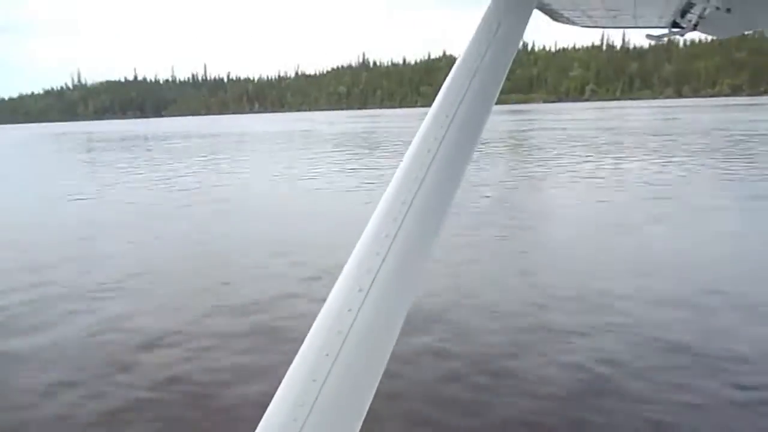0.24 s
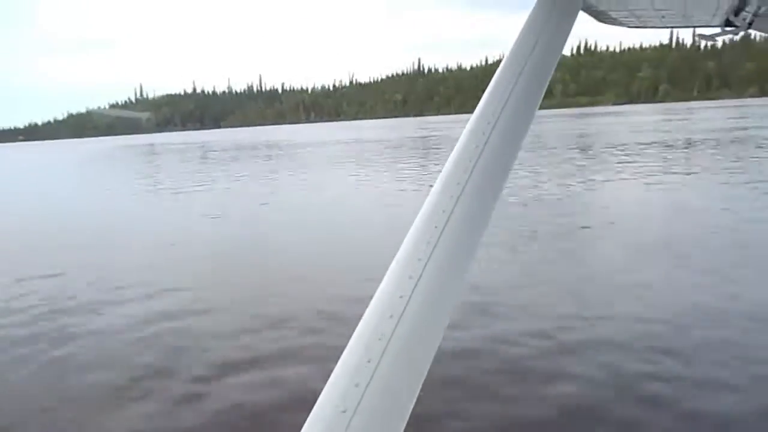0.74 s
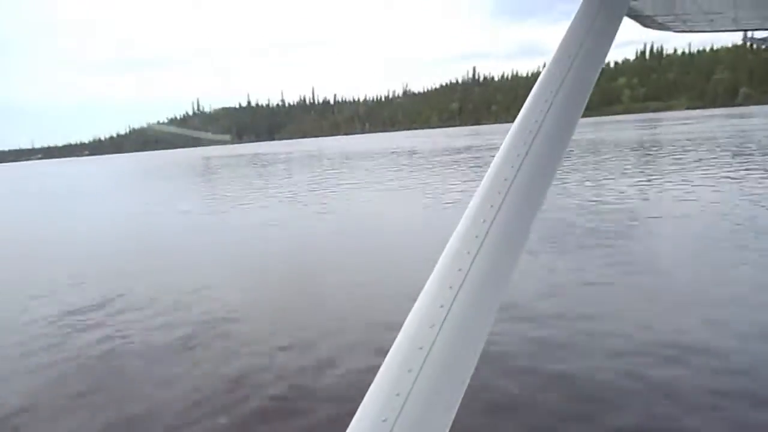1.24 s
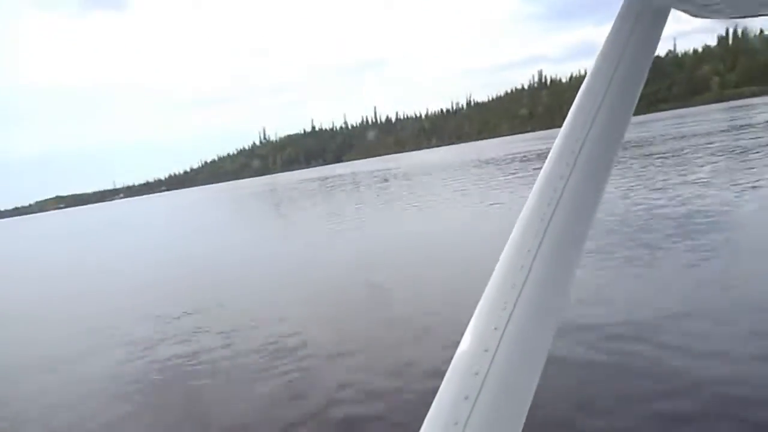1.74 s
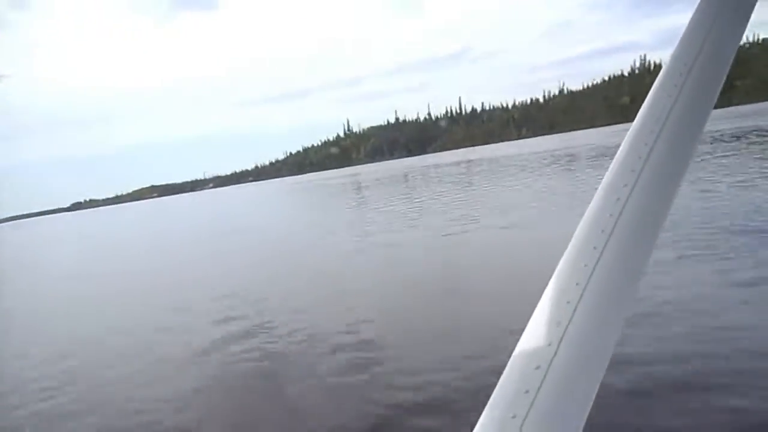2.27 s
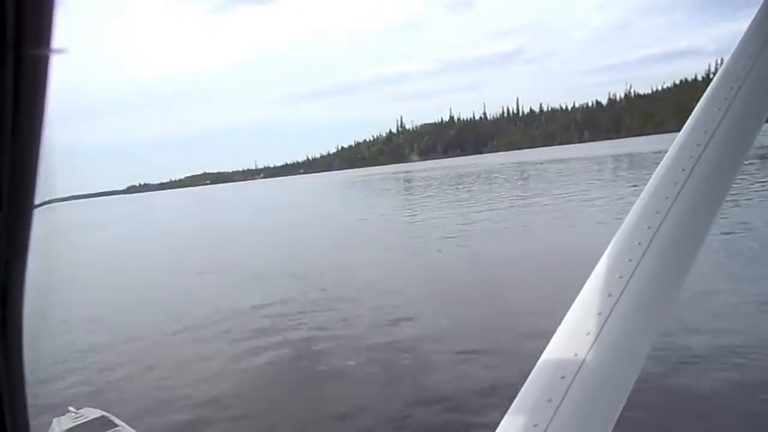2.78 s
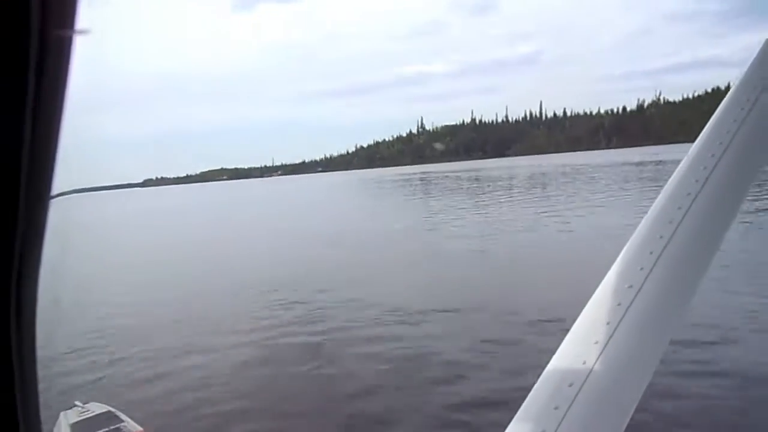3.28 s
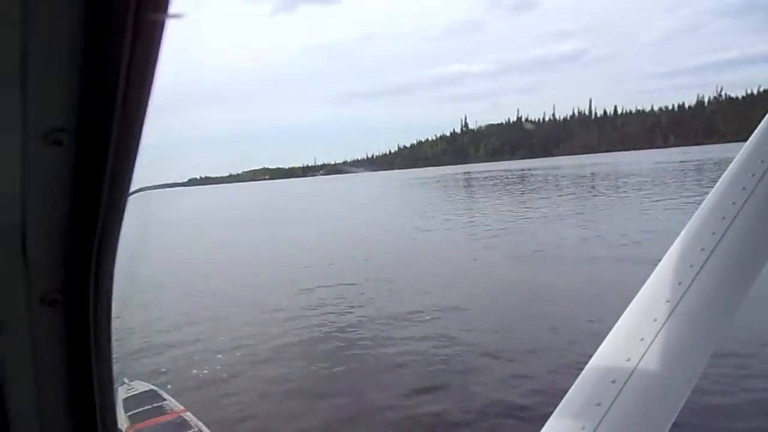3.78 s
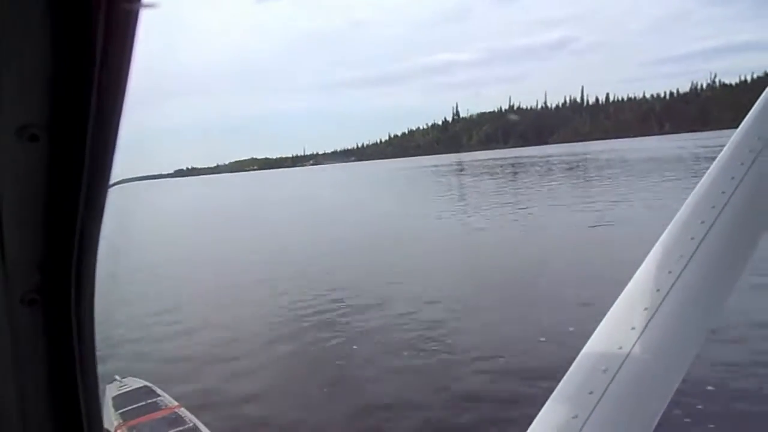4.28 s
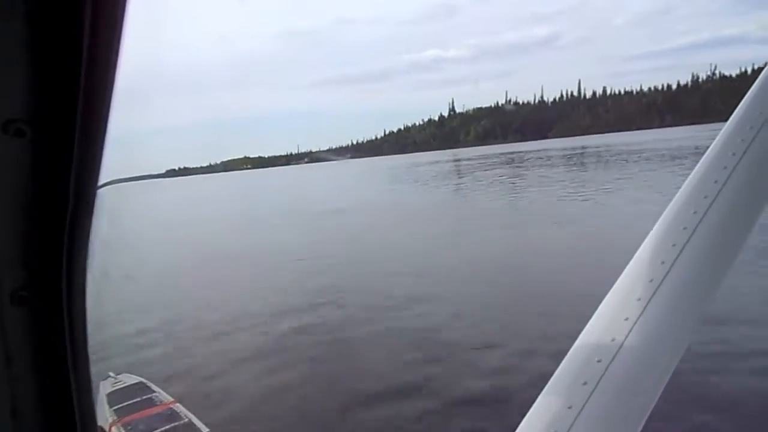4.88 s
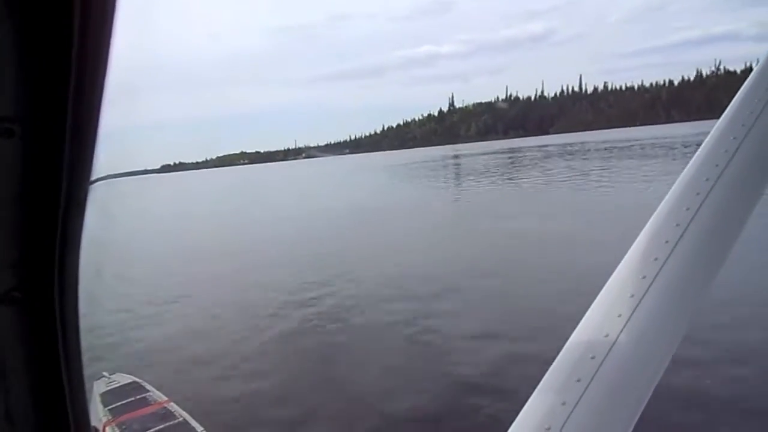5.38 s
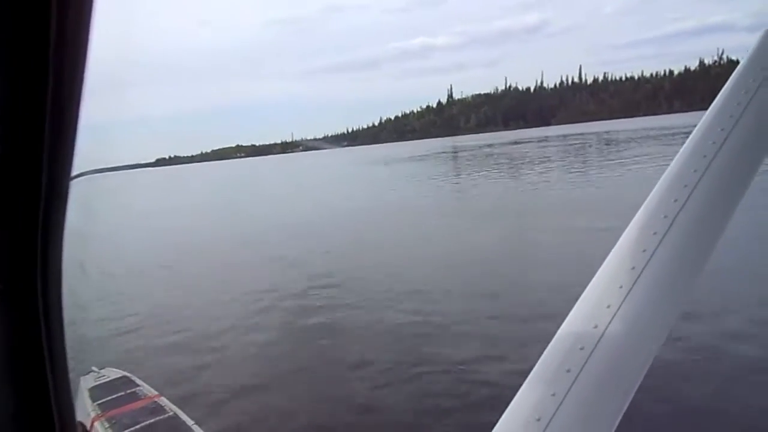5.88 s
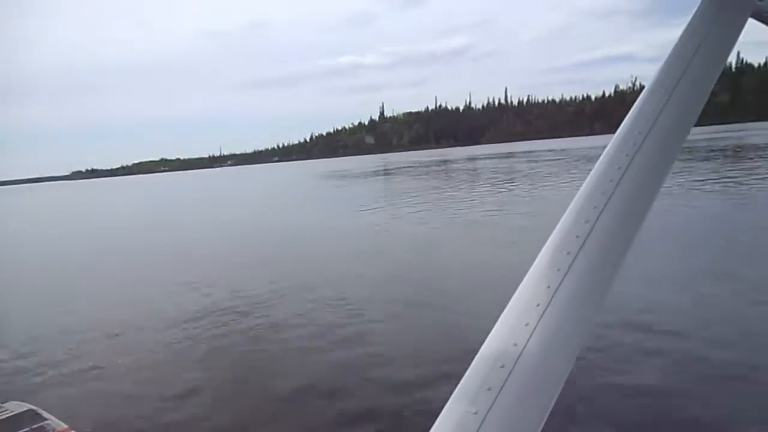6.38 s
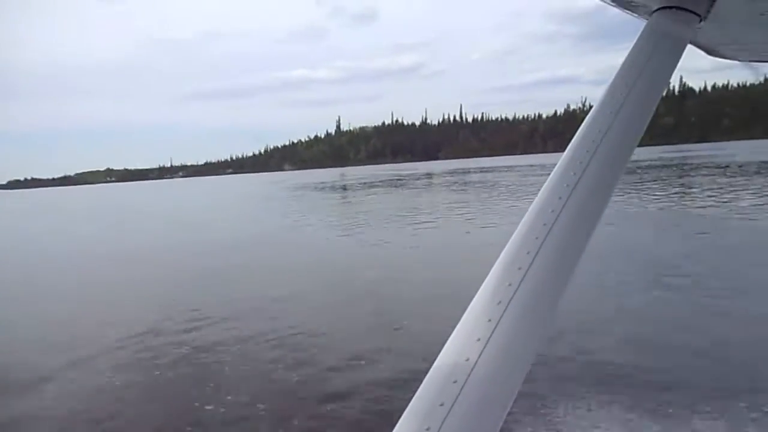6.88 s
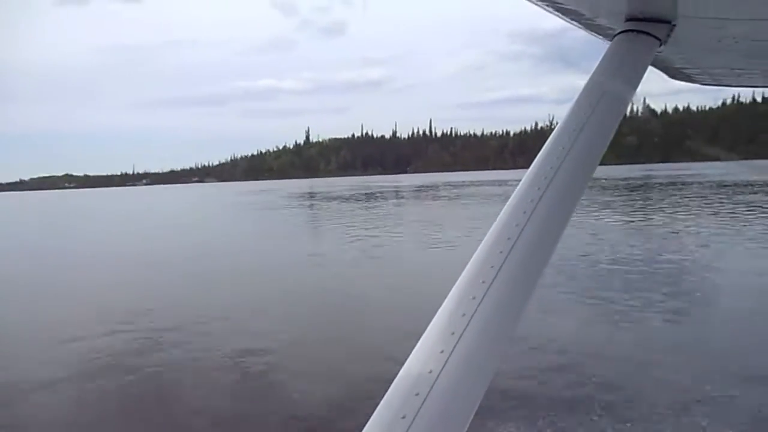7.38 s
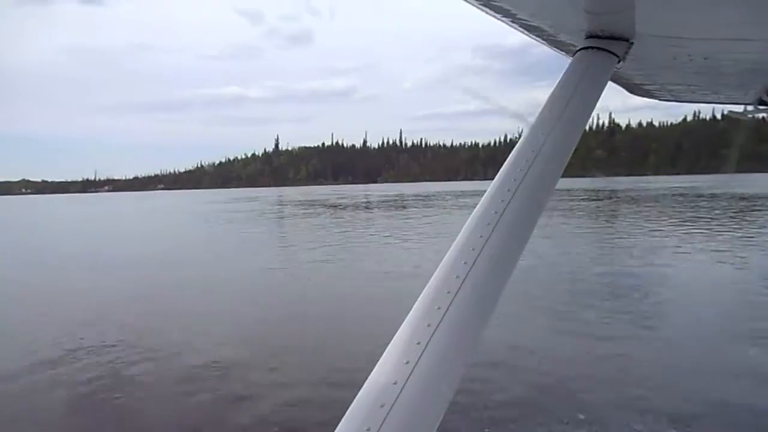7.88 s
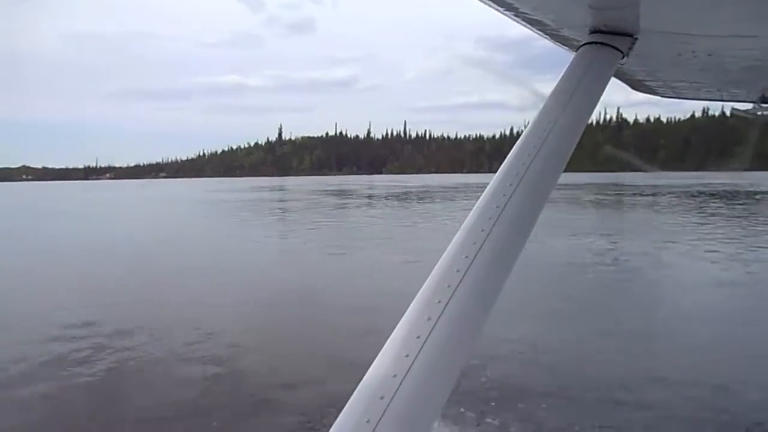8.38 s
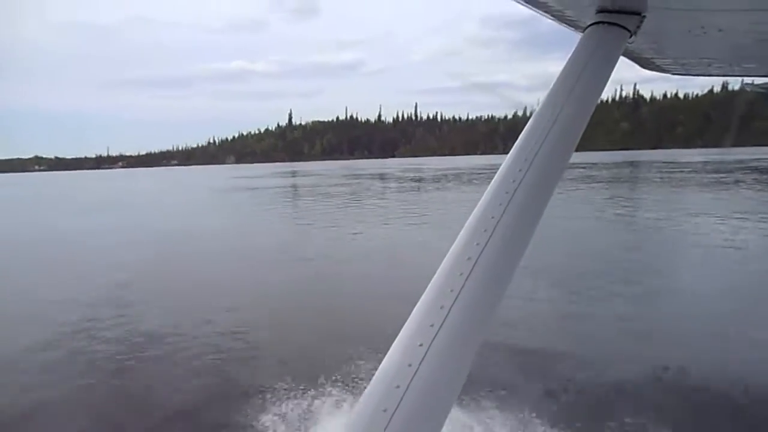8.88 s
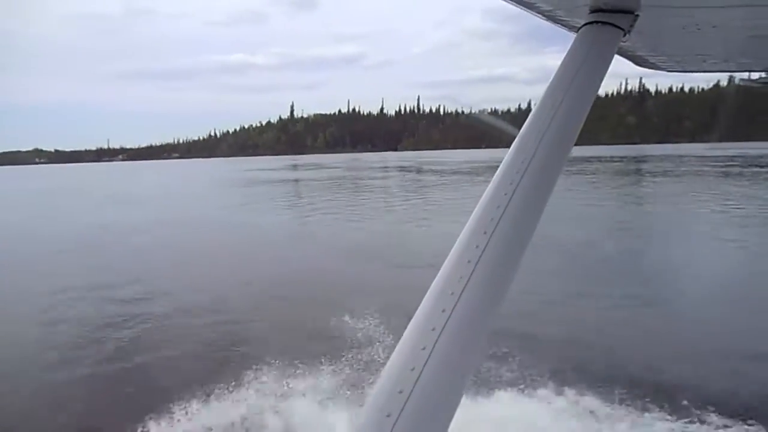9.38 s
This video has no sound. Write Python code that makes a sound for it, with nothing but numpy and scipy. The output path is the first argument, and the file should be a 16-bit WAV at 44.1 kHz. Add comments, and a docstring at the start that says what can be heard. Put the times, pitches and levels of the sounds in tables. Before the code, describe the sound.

From the start, a deep, uneven piston engine and propeller boom inside a small floatplane's cabin, with a low rumble and air rushing and hissing past the window. At about 0.8 seconds the throttle closes and the engine falls in pitch over the next few seconds, settling into a loping idle. A faint gear whine sinks with it, and a thin, wavering whistle sounds from about 1.4 to 3 seconds, along with a few tiny ticks. Loose trim clacks dully at 4 seconds and again at 6, the second leaving a faint metallic ring. The whistle returns near 7.7 seconds. At about 8.2 seconds the float touches the lake: water drums low on it, spray patters and hisses softly, and the engine beats a little harder until the end, around 9.6 seconds. The engine stays close and dominant throughout.

```python
"""Inside a floatplane settling onto a lake. From the start the nine-cylinder radial's uneven exhaust and
the two-blade propeller boom in the cabin, a gear whines faintly and air rushes past the window.
At 0.84 s the throttle closes and the engine runs down to a loping idle. A window gap whistles, small
fittings tick, loose trim knocks at 4 and 6 s, and the whistle returns. At 8.15 s the float touches:
water drums on it, spray patters and hisses, and the engine beats harder against the drag."""
import sys
import numpy as np
from scipy import signal
from scipy.fft import rfft, irfft, next_fast_len
from scipy.io import wavfile
from scipy.ndimage import uniform_filter1d, map_coordinates

SR = 44100
rng = np.random.default_rng(int(sys.argv[2]) if len(sys.argv) > 2 else 0)


def bounce(signal):
    """Save signal as a 16-bit WAV file at the path given by the first command-line argument."""
    frames = np.transpose(np.atleast_2d(signal))
    limited = np.clip(frames, -1, 1)
    pcm = np.round(limited * 32767).astype(np.int16)
    wavfile.write(sys.argv[1], SR, pcm)


N = 425120
TIME_S = np.arange(N) / SR


def amp(db):
    """Decibels to gain."""
    return 10 ** (np.asarray(db) / 20)


def unit(x):
    """Scale to rms 1."""
    return x / np.sqrt(np.mean(x ** 2) + 1e-20)


def along(points, hz):
    """Interpolate (Hz, value) points on a log axis."""
    point_hz, values = np.transpose(points)
    return np.interp(np.log(hz + 1), np.log(point_hz + 1), values)


def curve(points):
    """Interpolate (seconds, value) points at every sample."""
    return np.interp(TIME_S, *np.transpose(points))


def swell(start_s, attack_s, end_s, release_s):
    """Rise from 0 to 1 after the start, hold, fall after the end."""
    return np.clip((TIME_S - start_s) / attack_s, 0, 1) * np.clip(1 - (TIME_S - end_s) / release_s, 0, 1)


def wobble(rate_hz):
    """Smooth random curve of rms near 1."""
    knots = rng.standard_normal(4096)
    return map_coordinates(knots, [TIME_S * rate_hz], mode="mirror")


def filtered(x, response):
    """Apply a response given as a function of Hz."""
    size = next_fast_len(N + SR // 2)
    return irfft(rfft(x, size) * response(np.fft.rfftfreq(size, 1 / SR)), size)[..., :N]


def noise(spectrum):
    """Coloured noise of rms 1."""
    return unit(filtered(rng.standard_normal(N), lambda hz: amp(along(spectrum, hz))))


def wide_noise(spectrum, likeness, patchy_db):
    """Stereo noise of rms 1 with patches of random gain and a given left-right likeness."""
    def mid_side_gains(hz):
        turn = np.arccos(np.clip(along(likeness, hz), -1, 1)) / 2
        return amp(along(spectrum, hz)) * np.array([np.cos(turn), np.sin(turn)])

    frames = signal.stft(rng.standard_normal((2, N)), nperseg=512)[2]
    patches = uniform_filter1d(rng.standard_normal(frames.shape[1:]), size=16, axis=0)
    patches = uniform_filter1d(patches, size=12, axis=1)
    pair = signal.istft(frames * amp(patchy_db * unit(patches)), nperseg=512)[1][:, :N]
    mid, side = filtered(pair, mid_side_gains)
    return unit(np.array([mid + side, mid - side]))


def shaft_speed_hz(close_s=.84, idle_hz=17.3, surplus_hz=5.13, run_down_s=.96,
                   ease_hz_per_s=1.58, sag_hz_per_s=.093):
    """The throttle eases, then closes; the crankshaft runs down to an idle that sags with airspeed."""
    easing_hz = ease_hz_per_s * np.maximum(close_s - TIME_S, 0)
    run_down_hz = surplus_hz * np.exp(-np.maximum(TIME_S - close_s, 0) / run_down_s)
    return idle_hz - sag_hz_per_s * TIME_S + run_down_hz + easing_hz


# Each row: time in seconds, engine state (0 under power, 1 gliding, 2 idling).
ENGINE_STATE = [(0, 0), (.75, 0.22), (2, 0.48), (2.8, 0.85), (4.6, 0.99), (7.3, 1.9)]

def state_shares():
    """Crossfade weights of the three engine states."""
    return np.maximum(0, 1 - abs(curve(ENGINE_STATE) - np.arange(3)[:, None]))


# Each row: centre in Hz, width in Hz, lift in dB.
CABIN_MODES = [(41.4, 5.9, 7), (82.8, 19.1, 8.5)]

def boom_db(hz):
    """The cabin booms as a tone slides through one of its air modes."""
    return sum(db * .5 ** ((2 * (hz - centre) / width) ** 2) for centre, width, db in CABIN_MODES)


# Each row: shaft order, base level in dB under power, gliding, idling.
EXHAUST_ORDERS = [(2.5, -38, -36, -32), (3.0, -43, -34, -33), (3.5, -24, -28, -22), (4.0, -29, -38, -29),
                  (5.0, -28, -32, -48), (5.5, -24, -22, -26), (6.0, -35, -30, -36), (6.5, -44, -26, -32),
                  (7.0, -56, -38, -37), (7.5, -38, -36, -36), (8.0, -33, -27, -27), (8.5, -49, -34, -34),
                  (9.0, -31, -31, -23), (9.5, -42, -39, -39), (10.0, -48, -31, -28), (11.0, -59, -36, -30),
                  (11.5, -46, -43, -33), (12.5, -52, -40, -35), (13.0, -56, -55, -44),
                  (13.5, -60, -54, -42), (14.5, -55, -46, -48), (16.5, -69, -54, -49),
                  (18.0, -64, -57, -50)]

def exhaust(angle, shaft_hz, shares, firing_db=(-20.5, -20.5, -23.5), load_db=1.4, lope_db=3,
            waver_db=.8, uneven_db=2.5, orders_gain_db=.02):
    """Nine firings in two turns; unequal cylinders add the other orders, so the engine lopes."""
    firing_order = 4.5

    def beat(order):
        shift_rad = -.64 * order ** 2  # the pipes delay high orders
        shift_rad -= .8 * max(0, firing_order - order)  # low orders come through the airframe
        shift_rad -= .83 * (order % 1 == 0)  # crank shake on whole orders
        return np.sqrt(2) * np.cos(order * angle + shift_rad)

    drag = water_contact()
    level_db = np.array(firing_db) @ shares + boom_db(firing_order * shaft_hz) + load_db * drag
    out = amp(level_db + waver_db * wobble(12)) * beat(firing_order)
    for order, *state_db in EXHAUST_ORDERS:
        level_db = np.array(state_db) @ shares + orders_gain_db + lope_db * drag * (order < firing_order)
        out += amp(level_db + uneven_db * wobble(5)) * beat(order)
    return out


def propeller(angle, shaft_hz, shares, blade_db=(-18.5, -29, -26), octave_db=-16):
    """Two blades pass the cabin every turn."""
    level = amp(np.array(blade_db) @ shares + boom_db(2 * shaft_hz))
    return np.sqrt(2) * level * (np.sin(2 * angle) + amp(octave_db) * np.sin(4 * angle))


# Each row: frequency in Hz, relative density in dB under power, gliding, idling.
RUMBLE_SPECTRA = [(5, -52, -52, -52), (15, -40, -42, -43), (30, -40, -39, -37), (47, -46, -47, -41),
                  (65, -46, -45, -40), (85, -48, -42, -44), (120, -51, -44, -49), (160, -53, -47, -45),
                  (195, -55, -52, -50), (245, -62, -57, -59), (330, -69, -64, -63), (600, -95, -95, -95),
                  (2000, -140, -140, -140)]

def rumble(shares, gain_db=.7):
    """Irregular combustion shakes the cabin panels."""
    def state_gains(hz):
        table = np.array(RUMBLE_SPECTRA)
        return amp([along(table[:, [0, column]], hz) for column in (1, 2, 3)])

    shaking = rng.standard_normal(N) * np.sqrt(SR / 2)  # unit power per Hz
    return amp(gain_db) * np.sum(shares * filtered(shaking, state_gains), axis=0)


def gear(angle, mesh_order=72.3, steady_db=-68.5, overrun_db=-61.5, waver_db=.2):
    """Accessory gear teeth whine, louder while the propeller drives the slowing engine."""
    overrun = swell(start_s=1.1, attack_s=2, end_s=3.56, release_s=.5)
    level = (amp(steady_db) + amp(overrun_db) * overrun) * amp(waver_db * wobble(9.9))
    return np.sqrt(2) * level * np.sin(mesh_order * angle + .5 * wobble(25))


# Each row: time in seconds, base level of the window draught in dB.
DRAUGHT_LEVEL = [(0, -60), (2.9, -56), (3.5, -54.5), (3.9, -55), (4.4, -57), (8, -55.5), (9.64, -55.5)]
# Air at the hull, window and seals. Each row: frequency in Hz, relative density in dB.
ROAR_SPECTRUM = [(150, -36), (300, -5), (450, -5), (620, -8), (800, -11.5), (1000, -18), (1500, -32.5),
                 (4000, -79)]
RUSH_SPECTRUM = [(500, -29), (950, -7.5), (1250, 2), (1550, -1), (1850, 0.3), (2100, -2), (2450, -1),
                 (3100, -8), (4000, -13), (5200, -18.5), (8000, -70), (14000, -53)]
HISS_SPECTRUM = [(900, -23), (2500, -12), (4000, -1.5), (5000, -3.5), (6300, -2), (8500, -5), (10200, -3),
                 (11800, 2), (13000, -1), (14200, -4)]
# Each row: frequency in Hz, left-right likeness from 0 to 1.
HISS_LIKENESS = [(1000, 1), (2500, 1), (4000, 0.31), (7000, 0.44), (12000, .03)]

def slipstream(angle, roar_db=-40.5, rush_db=-48, hiss_gain_db=4, side_db=-24.5, wash_depth=.074,
               roar_fall_db_per_s=.35, rush_fall_db_per_s=.48):
    """Air roars on the hull and rushes at the window, fading as the plane slows; the seals hiss."""
    draught_db = curve(DRAUGHT_LEVEL)
    swing_db = draught_db - draught_db.mean()
    flutter = wobble(35)
    roar_drift_db = .3 * swing_db - roar_fall_db_per_s * TIME_S + .54 * wobble(23)
    roar = amp(roar_db + roar_drift_db) * noise(ROAR_SPECTRUM)
    rush_drift_db = .76 * swing_db - rush_fall_db_per_s * TIME_S + .78 * flutter
    mid = noise(RUSH_SPECTRUM)
    side = amp(side_db) * noise(RUSH_SPECTRUM) * np.array([[1], [-1]])
    rush = amp(rush_db + rush_drift_db) * (mid + side)
    hiss = wide_noise(HISS_SPECTRUM, HISS_LIKENESS, patchy_db=1.1)
    hiss *= amp(draught_db + hiss_gain_db + .38 * flutter)
    propeller_wash = 1 + wash_depth * np.cos(angle)
    balance = amp([[-.7], [.7]])
    return roar + rush + hiss * propeller_wash * balance


# Each row: start in seconds, end in seconds, pitch in Hz, level in dB, waver as a share of pitch.
GAP_WHISTLES = [(7.7, 11, 2960, -68, .02), (1.4, 3.1, 2750, -70, .03)]

def whistles(attack_s=.03, release_s=.14, waver_db=1.6):
    """Air sings in the window gaps in thin, unsteady tones."""
    out = np.zeros(N)
    for start_s, end_s, hz, db, waver in GAP_WHISTLES:
        gate = swell(start_s, attack_s, end_s - release_s, release_s)
        phase = 2 * np.pi * np.cumsum(hz * (1 + waver * wobble(60))) / SR
        out += np.sqrt(2) * amp(db + waver_db * wobble(12)) * gate * np.sin(phase)
    return out


# Each row: start in seconds, band centre in Hz, relative level in dB.
SMALL_TICKS = [(2.148, 6030, -45), (2.480, 5700, -48), (2.590, 6100, -49), (4.266, 4100, -42),
               (8.735, 5500, -48), (9.094, 11500, -42), (9.160, 7500, -46)]

def ticks(t60_s=.02, width_octaves=.25):
    """Small fittings and drops tick, each a brief, bright ring."""
    age_s, out = np.arange(2048) / SR, np.zeros(N + SR)
    octaves = np.log2(np.fft.rfftfreq(len(age_s), 1 / SR) + 1)
    for start_s, hz, db in SMALL_TICKS:
        band = np.exp(-((octaves - np.log2(hz)) / width_octaves) ** 2)
        ring = unit(irfft(rfft(rng.standard_normal(len(age_s))) * band))
        out[round(start_s * SR):][:len(age_s)] += amp(db - 60 * age_s / t60_s) * ring / 2
    return out[:N]


# Each row: start in seconds, clack level in dB, clack T60 in seconds, ring level in dB.
TRIM_KNOCKS = [(4.010, -36.5, .12, -85), (6.048, -37, .12, -62.5)]
# Each row: frequency in Hz, relative density in dB.
TRIM_SPECTRUM = [(250, -14), (500, -9), (750, 5), (1150, 6), (1600, 0), (2900, -7), (4500, -14),
                 (6200, -16), (9000, -28), (14000, -34)]

def knocks(rise_s=.0027, ring_hz=3990, ring_t60_s=2.5):
    """Loose cabin trim clacks dully and sets a small metal fitting ringing."""
    envelope, ring = np.zeros(N), np.zeros(N)
    for start_s, db, t60_s, ring_db in TRIM_KNOCKS:
        age_s = np.maximum(TIME_S - start_s, 0)
        onset = 1 - np.exp(-age_s / rise_s)
        envelope += amp(db - 60 * age_s / t60_s) * onset
        tone = np.sqrt(2) * np.sin(2 * np.pi * ring_hz * age_s)
        ring += amp(ring_db - 60 * age_s / ring_t60_s) * onset * tone
    return envelope * noise(TRIM_SPECTRUM) + ring


def water_contact():
    """How hard the float cuts the water, 0 to 1."""
    return swell(start_s=8.15, attack_s=.3, end_s=9.3, release_s=1.2)


# Each row: frequency in Hz, relative density in dB.
FLOAT_SPECTRUM = [(100, -29), (220, 6), (300, -15), (450, -14), (1500, -60), (4000, -100)]

def float_drum(level_db=-40):
    """Water drums on the hollow float."""
    return amp(level_db) * water_contact() * noise(FLOAT_SPECTRUM)


def spray(level_db=-59, centre_hz=6000, cycles=3, count=1500):
    """Drops from the float patter on the hull, each a tiny damped ring."""
    age_s, sides = np.arange(128) / SR, []
    for _ in range(2):
        when, pitch, size = rng.random((count, 3)).T
        hz = centre_hz * 2 ** (2 * pitch - 1)[:, None]
        gain = amp(.5 * np.log(size + .0085))[:, None]
        drops = gain * np.sin(2 * np.pi * hz * age_s) * np.exp(-2 * hz * age_s / cycles)
        samples = (when * N).astype(int)[:, None] + np.arange(len(age_s))
        sides.append(np.bincount(samples.ravel(), drops.ravel(), N)[:N])
    return amp(level_db) * water_contact() * unit(np.array(sides))


# Each row: frequency in Hz, relative density in dB.
SHEET_SPECTRUM = [(400, -22), (900, 10), (1400, 2.5), (2400, 2), (3500, -9), (6000, -22), (14000, -45)]

def water_sheet(level_db=-51, surge_db=1):
    """A sheet of water thrown off the float hisses and surges with the ripples."""
    return amp(level_db + surge_db * wobble(9.4)) * water_contact() * noise(SHEET_SPECTRUM)


def cabin(x, t60_s=.047, echo_db=-18):
    """Close walls and windows reflect within milliseconds."""
    age_s = np.arange(2048) / SR
    tail = rng.standard_normal(len(age_s)) * amp(-60 * age_s / t60_s) * (age_s > .001)
    tail /= np.linalg.norm(tail)
    return x + amp(echo_db) * signal.fftconvolve(x, tail[None], axes=1)[:, :N]


def scene():
    """The crankshaft drives all engine sounds, alike at both ears; air, airframe and water join them."""
    shaft_hz, shares = shaft_speed_hz(), state_shares()
    angle = 2 * np.pi * np.cumsum(shaft_hz) / SR
    beats = exhaust(angle, shaft_hz, shares) + propeller(angle, shaft_hz, shares)
    engine = beats + rumble(shares) + gear(angle)
    direct = engine + float_drum() + whistles()
    return direct + cabin(slipstream(angle) + knocks() + ticks() + spray() + water_sheet())


def record(dry, mismatch_rad=.011, top_hz=14200):
    """Two band-limited microphone capsules differ slightly in phase."""
    phase = np.exp(1j * mismatch_rad * np.array([[1], [-1]]))
    return filtered(dry, lambda hz: (hz < top_hz) * phase)


dry = scene()
out = record(dry)
bounce(out)
```